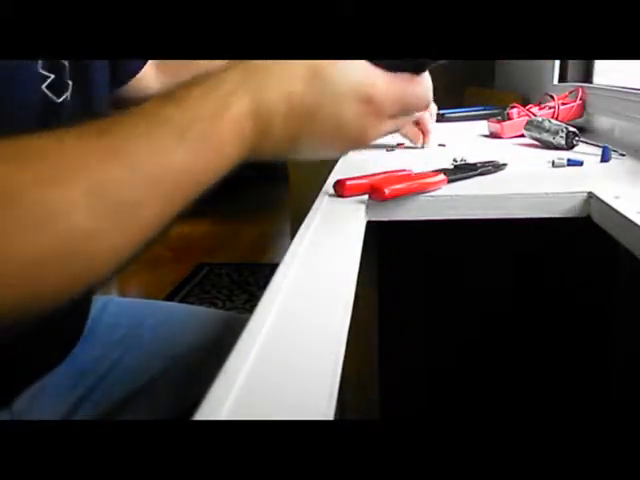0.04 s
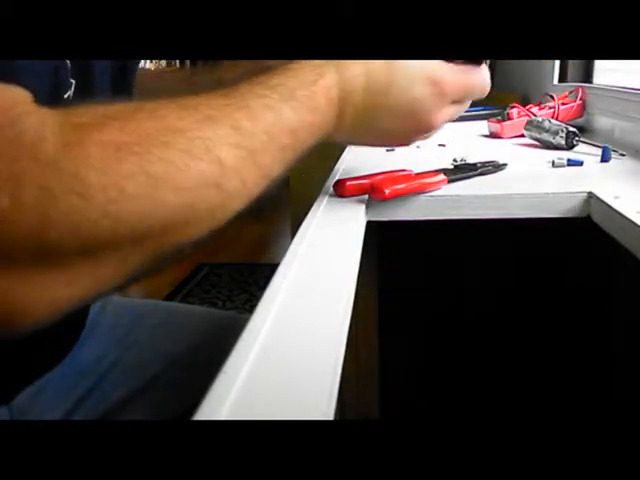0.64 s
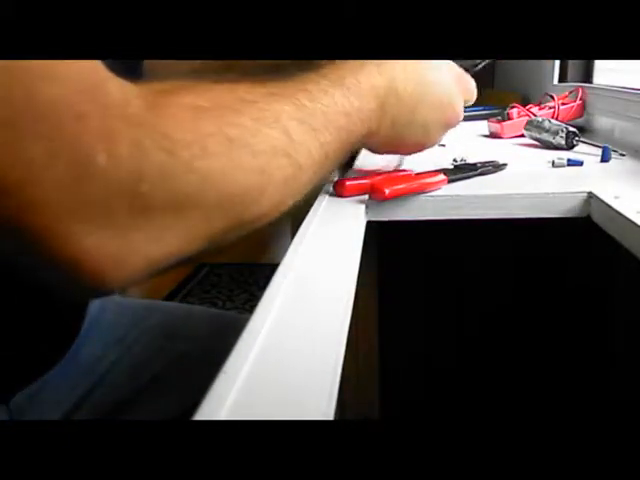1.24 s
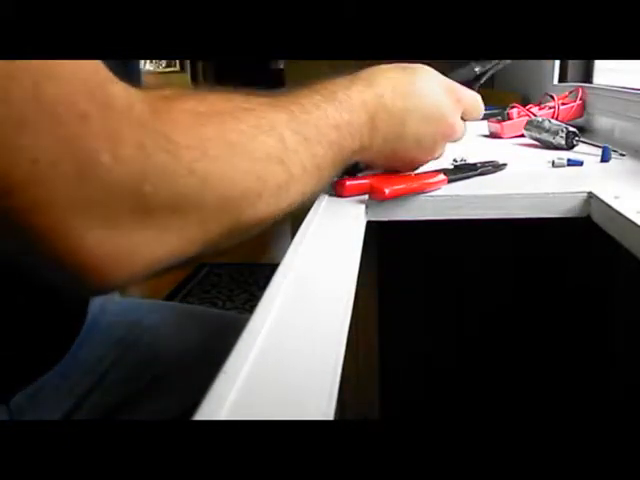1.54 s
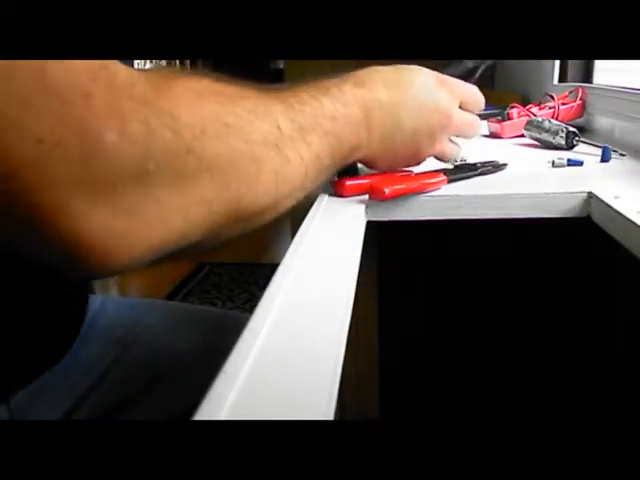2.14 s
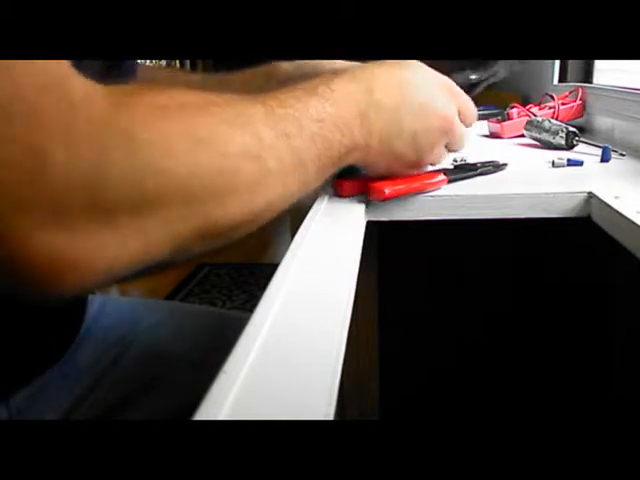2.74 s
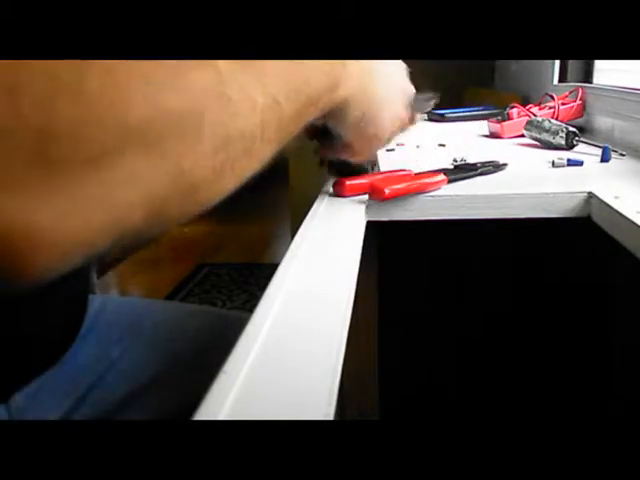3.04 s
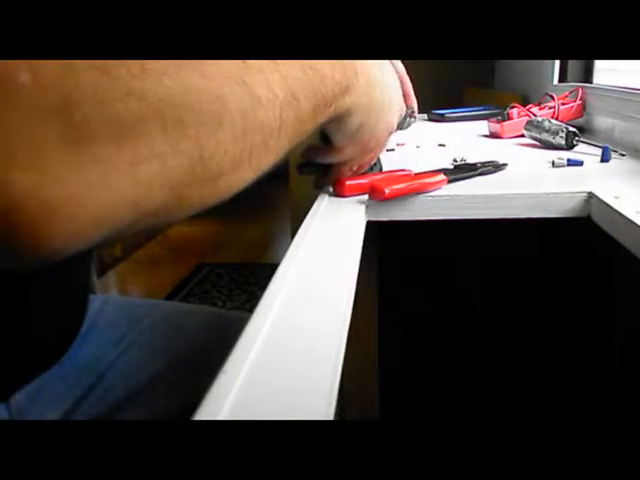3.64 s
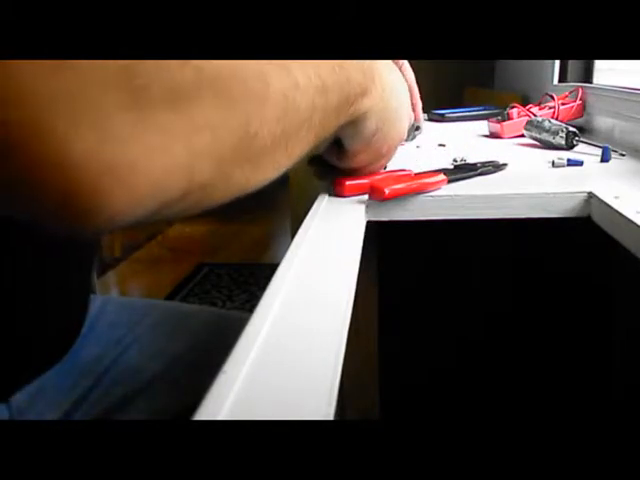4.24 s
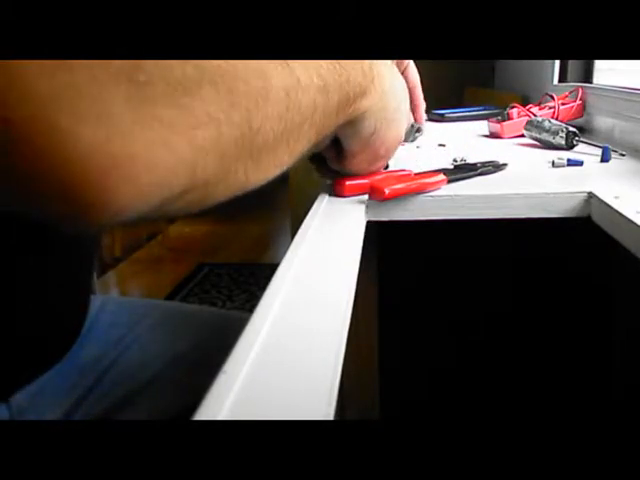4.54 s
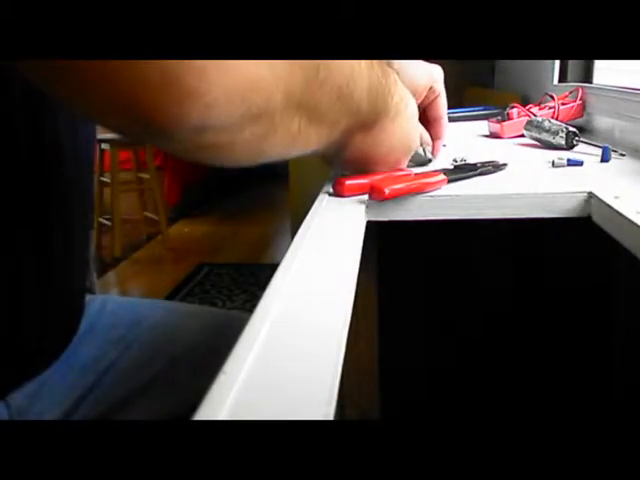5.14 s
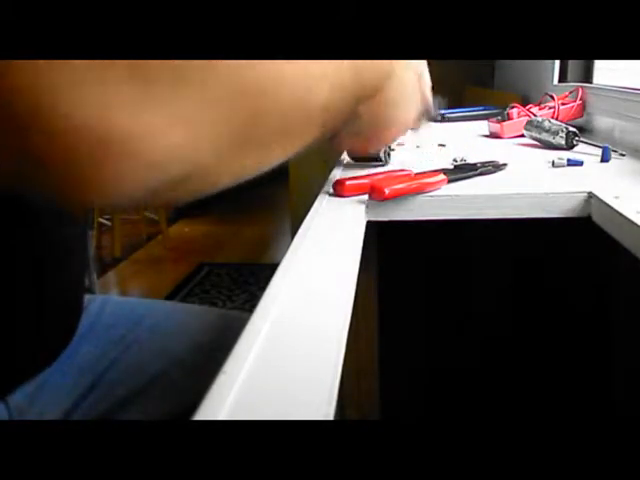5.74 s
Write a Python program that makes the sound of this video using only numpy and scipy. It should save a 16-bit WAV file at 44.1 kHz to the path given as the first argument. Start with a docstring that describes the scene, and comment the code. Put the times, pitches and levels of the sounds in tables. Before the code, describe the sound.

A steel wire stripper clicks and bites, with a faint hiss of insulation sliding through its jaws. Tools then knock and drag on a wooden bench, building to a loud clatter with hollow thumps. Stiff wire rubs softly and rasps along the bench edge, followed by sharp snaps and the grating of a tool tip. The sounds are close, in a small, quiet room, with slightly muted treble.

```python
"""A steel wire stripper clicks in the hand; its jaws bite twice and insulation hisses through them.
From about one second, tools knock and drag on a wooden bench, whose boards boom in their normal modes.
Stiff wire then rubs lightly on the bench and rasps along its edge by stick-slip friction. Last come
more snaps, a slide and the grating of the tool's tip. Throughout, a small room reverberates, and
a narrow-band recorder cuts the treble above 7 kHz and clips any snap that overloads it."""
import sys
import numpy as np
from scipy import signal
from scipy.fft import rfft, irfft, next_fast_len
from scipy.io import wavfile
from scipy.ndimage import map_coordinates

SR = 44100
rng = np.random.default_rng(int(sys.argv[2]) if len(sys.argv) > 2 else 0)


def file_out(sig):
    """Save sig as 16-bit WAV at sys.argv[1]."""
    # one column per channel
    cols = np.atleast_2d(sig).T
    # limit, then scale
    lim = np.clip(cols, -1, 1)
    pcm = np.round(lim * 32767).astype(np.int16)
    wavfile.write(sys.argv[1], SR, pcm)


N = 259749
CONTACT_S = np.arange(SR // 3) / SR  # time within one contact

# low and high normal modes of the bench boards: frequency_hz, level_db, t60_s
BOOM_MODES = [(175.7, -16.5, 0.18), (236.1, -13, 0.014), (289.1, 2.5, 0.13), (315.6, 11, 0.062),
              (430, -11.5, 0.01)]
KNOCK_MODES = [(477, -9, 0.0083), (536.3, 2.5, 0.072), (602, 6, 0.056), (652, -1.5, 0.054),
               (855, -11.5, 0.078), (1109, -15.5, 0.034), (1231, -14.5, 0.092)]
# spectra of an impact's midrange body and bright edge: frequency_hz, level_db
BODY_SPECTRUM = [(60, -33), (400, -13.5), (900, -0.5), (1250, 2.5), (1550, -3.5), (2100, 1.5), (2900, 0),
                 (3800, -3.5), (7000, -20.5)]
EDGE_SPECTRUM = [(300, -16), (2000, -13), (3400, -1), (4500, 1.5), (5500, 1.5), (6800, -1.5), (10000, 0.5)]


def bench_blows():
    """Impact excitation: the tool cracks, brighter the harder the contact; the heavy boards follow."""
    # snips and blows that reach the bench: start_s, level_db, hardness_db, boom_db
    blows = [(1.099, -10, 3.5, -9.5), (1.156, -20, -0.5, -20), (1.169, -9, 0.5, 1),
             (1.263, -8.5, -10, -4.5), (1.279, -12.5, -8, -2.5), (1.364, -29, 3, -3),
             (1.965, -33.5, -0.5, 7.5), (2.218, -7.5, -16, -2.5), (2.241, -18, -19, 8),
             (2.581, -25, -16.5, 2), (2.624, -17.5, -13, -7), (2.658, -2.5, -19.5, -17),
             (2.673, -18, -8, -11), (2.749, -9, -18, -13), (2.77, -3.5, -18, -12), (2.819, -22, -10, -9),
             (3.073, -31.5, -15.5, 7), (3.091, -26, -10, -4), (4.86, -6.5, -4, -1), (5.167, -27, -9, 1),
             (5.236, -18, 9, 1.5), (5.405, -22.5, -1.5, -5.5), (5.823, -6.5, -16, -18),
             (5.835, -12, -31, -12.5)]
    crack_t60_s = 0.049
    out = np.zeros(N)
    for start_s, level_db, hardness_db, boom_db in blows:
        body = crack(BODY_SPECTRUM, crack_t60_s)
        edge = amp(0.95 * hardness_db - 2) * crack(EDGE_SPECTRUM, 0.74 * crack_t60_s)
        boom = amp(boom_db) * ring(BOOM_MODES, attack_s=0.011)
        knock = ring(KNOCK_MODES, attack_s=0.0041)
        add(out, start_s - 0.0005, amp(level_db + hardness_db - 4) * (body + edge))
        add(out, start_s + 0.0015, amp(level_db - 5) * (boom + knock))
    return out


def stripper_clicks():
    """Steel-on-steel impact: a tick, a ping set by the contact point, and the handles' free vibration."""
    # clicks of the jaws and spring: start_s, level_db, ping_hz
    clicks = [(0.0186, -22, 5500), (0.0504, -29, 5070), (0.6235, -30, 5500), (0.6663, -41, 3030),
              (0.71, -44.5, 1870), (0.817, -43.5, 2470), (1.004, -26.5, 1780), (1.0287, -19.5, 1910),
              (1.2304, -35.5, 2840), (1.839, -47, 3740), (2.193, -27, 5010), (2.3494, -48, 6120),
              (2.4527, -37, 3570), (2.749, -23, 4300), (4.331, -48.5, 4360), (4.4987, -49.5, 3020),
              (5.3103, -25, 6400), (5.3428, -34, 6370), (5.8508, -31.5, 3230), (5.8747, -36.5, 3400)]
    # normal modes of the steel: frequency_hz, level_db, t60_s
    steel_modes = [(1240, -16.5, 0.09), (1797, -11, 0.085), (2555, -3, 0.055), (3030, -10, 0.078),
                   (3650, -14.5, 0.11)]
    neutral_ping_hz, sharpen_db_per_octave = 2940, 6.5  # a higher ping has more edge and less body
    out = np.zeros(N)
    for start_s, level_db, ping_hz in clicks:
        sharp_db = sharpen_db_per_octave * np.log2(ping_hz / neutral_ping_hz)
        body = amp(-14 - sharp_db) * crack(BODY_SPECTRUM, t60_s=0.085)
        edge = amp(sharp_db - 2.5) * crack(EDGE_SPECTRUM, t60_s=0.045)
        ping_spectrum = [(0.6 * ping_hz, -30), (0.94 * ping_hz, -14), (ping_hz, 0),
                         (1.06 * ping_hz, -14), (1.5 * ping_hz, -30)]
        ping = amp(-5.5) * crack(ping_spectrum, t60_s=0.06)
        handles = amp(-11 - sharp_db) * ring(steel_modes, attack_s=0.00044)
        add(out, start_s - 0.0005, amp(level_db) * (body + edge + ping + handles))
    return out


def tool_drags():
    """Forced vibration: dragged tools make the boards rumble."""
    # drags: start_s, length_s, pressure_db, grit_db
    strokes = [(1.285, 0.018, -17, -5), (1.33, 0.11, -42, 3.5), (1.45, 0.021, -35.5, 8.5),
               (1.48, 0.033, -32, -15.5), (1.595, 0.043, -47, 5.5), (1.957, 0.029, -26.5, -6.5),
               (2.11, 0.037, -37, -20), (2.19, 0.055, -25, 3), (2.27, 0.02, -40, -20),
               (2.37, 0.059, -39, -7), (2.463, 0.084, -36.5, -22), (2.58, 0.066, -28.5, -3),
               (2.635, 0.12, -13, -5), (2.79, 0.14, -24, -14), (2.95, 0.058, -35.5, -24),
               (3.05, 0.08, -31.5, -18), (3.19, 0.15, -44.5, -30), (4.9, 0.056, -34, -26)]
    # bench resonances: centre_hz, width_hz, level_db
    peaks = [(126, 110, -12), (177, 26, -26.5), (292, 11, 7.5), (313.6, 12.2, 19.5), (540, 37, 12),
             (627.4, 17, 2.5), (651, 10, -15.5), (836, 10, -10), (1082, 72, -4), (1130, 77, 7.5),
             (1390, 27, -6.5)]
    # spectrum of the grit: frequency_hz, level_db
    grit = [(300, -6.5), (900, 7.5), (1300, 13.5), (1600, 9.5), (2300, 11), (3500, 1.5), (5000, -1.5),
            (7000, -11.5), (10000, -7)]
    return scrape(strokes, peaks, grit, boards_db=-2, grating_db=-5.5,
                  catches_per_s=2300, rise_s=0.0053, release_db_per_s=546)


def wire_pulls():
    """Stick-slip friction: stiff wire rasps hollowly along the bench edge."""
    # pulls: start_s, length_s, pressure_db, grit_db
    strokes = [(4.536, 0.071, -20.5, -6.5), (4.625, 0.11, -22, -7), (4.766, 0.075, -25.5, 1.5)]
    # resonances at the edge: centre_hz, width_hz, level_db
    peaks = [(283.6, 23.4, 3.5), (554, 15, 0.5), (665, 49, 10), (780, 33, -13.5), (1140, 45, -7.5),
             (1160, 78, -16)]
    # spectrum of the grit: frequency_hz, level_db
    grit = [(400, -17), (1000, 9), (1400, 10), (2000, 4.5), (2450, 12.5), (3100, 4.5), (4400, -7),
            (5300, -6.5), (7000, -16.5), (10000, -10.5)]
    return scrape(strokes, peaks, grit, boards_db=2.5, grating_db=-1,
                  catches_per_s=2200, rise_s=0.0084, release_db_per_s=528)


def tip_push():
    """Friction at a point contact: the tool's tip grates brightly across the bench top."""
    # pushes: start_s, length_s, pressure_db, grit_db
    strokes = [(5.613, 0.066, -23.5, -10), (5.655, 0.17, -19, -6.5), (5.815, 0.091, -24.5, -7)]
    # resonances under the tip: centre_hz, width_hz, level_db
    peaks = [(167, 45, -31), (318, 13, 4), (542, 10, 6), (607, 24, 6), (673, 23, -24), (880, 38, -28),
             (1140, 82, -12), (1336, 51, -14)]
    # spectrum of the grit: frequency_hz, level_db
    grit = [(300, -26), (900, 9.5), (1400, 7.5), (1900, 4.5), (2600, 2), (3500, 1), (5000, -4),
            (6300, -1.5), (7000, -14.5), (10000, -5)]
    return scrape(strokes, peaks, grit, boards_db=-4, grating_db=-1,
                  catches_per_s=3000, rise_s=0.025, release_db_per_s=534.5)


def bench_bumps():
    """A soft impact excites only the boards, slowly and mostly in their low modes."""
    # bumps of hand and handles: start_s, level_db
    bumps = [(1.409, -32), (1.474, -26.5), (1.496, -31.5), (1.804, -32), (2.589, -17.5), (2.689, -18),
             (2.705, -25), (2.74, -20), (2.849, -22), (3.13, -27.5), (3.276, -36.5), (3.663, -30),
             (3.418, -40), (4.141, -31), (4.458, -19), (4.809, -25), (5.073, -37), (5.453, -33.5)]
    out = np.zeros(N)
    for start_s, level_db in bumps:
        boom = ring(BOOM_MODES, attack_s=0.0062)
        knock = amp(-10) * ring(KNOCK_MODES, attack_s=0.018)
        add(out, start_s, amp(level_db - 4.5) * (boom + knock))
    return out


def insulation_hiss():
    """Friction noise: on smooth insulation, dense catches merge into a hiss."""
    # slides through fingers and jaws: start_s, length_s, level_db, swell_db_per_s
    slides = [(0.001, 0.062, -30.5, -30), (0.133, 0.39, -53, 33.5), (0.58, 0.3, -46.5, -17),
              (5.229, 0.16, -27, -46), (5.517, 0.024, -50, 30)]
    # spectrum of the hiss: frequency_hz, level_db
    spectrum = [(100, -10), (600, -4), (1300, -9.5), (2500, -5.5), (5000, -9), (7000, -12), (10000, -4)]
    envelope = sum(amp(db) * stroke(start_s, length_s, 0.015, release_db_per_s=403, swell_db_per_s=swell)
                   for start_s, length_s, db, swell in slides)
    return amp(3) * envelope * coloured(catches(16000, spread_db=3, clump_db=0.5), spectrum)


def jaw_rasp():
    """Resonance: friction drives the biting jaws at their natural frequencies."""
    # bites: start_s, length_s, level_db, swell_db_per_s
    bites = [(0.527, 0.016, -24, 2), (0.565, 0.03, -36.5, -67)]
    # jaw resonances: centre_hz, width_hz, level_db
    peaks = [(1864, 90, 14), (2130, 200, 4.5), (2530, 60, 9.5), (2940, 130, 2.5), (3270, 57, 5)]
    envelope = sum(amp(db) * stroke(start_s, length_s, 0.015, release_db_per_s=715, swell_db_per_s=swell)
                   for start_s, length_s, db, swell in bites)
    return amp(-0.5) * envelope * resonate(catches(980, spread_db=-2.5, clump_db=2.5), peaks)


def wire_rubbing():
    """Light, unbroken friction drives damped boards: a soft rumble with a little grit."""
    # the hand's pressure on the wire: time_s, pressure_db
    pressure_curve = [(3.47, -76), (3.512, -46), (3.588, -52), (3.686, -36), (3.744, -51), (3.81, -34.5),
                      (3.942, -49), (3.98, -37), (4.064, -50.5), (4.142, -38.5), (4.264, -57), (4.44, -47)]
    # resonances damped by the resting hand: centre_hz, width_hz, level_db
    peaks = [(304.4, 24, 16.5), (526, 13.5, 10.5), (610, 40, 10), (684, 32, -24)]
    # spectrum of the grit: frequency_hz, level_db
    grit = [(300, -12.5), (1100, -4), (1800, 7.5), (2400, 10), (3200, -4), (7000, -32)]
    time_s, pressure_db = np.transpose(pressure_curve)
    pressure = amp(np.interp(np.arange(N) / SR, time_s, pressure_db, left=-200, right=-200))
    boards = boards_shaken(catches(1800, spread_db=4, clump_db=2.5), peaks)
    grating = coloured(slips(3000, spread_db=2, clump_db=2), grit)
    return pressure * (amp(3) * boards + amp(-16.5) * grating)


def reverberation(x):
    """A diffuse field decays exponentially; its tail changes as the hands move."""
    # the room's reverberation time: frequency_hz, t60_s
    decay_times = [(150, 0.51), (600, 0.28), (2500, 0.28), (7000, 0.24)]
    hop, delay_s = SR // 2, 0.0071
    out = np.zeros(N)
    for centre in range(0, N + hop, hop):
        hz, t, noise = signal.stft(rng.standard_normal(SR // 2), SR, nperseg=256)
        decay = np.exp(-np.log(1000) * t / along(decay_times, hz)[:, None])
        tail = signal.istft(noise * decay, SR, nperseg=256)[1]
        start = max(centre - hop, 0)
        part = x[start:centre + hop]
        crossfade = 1 - abs(start + np.arange(len(part)) - centre) / hop
        add(out, start / SR + delay_s, signal.fftconvolve(part * crossfade, tail / np.linalg.norm(tail)))
    return out


def room_air():
    """Stationary noise: the room's air, strongest in the bass."""
    # spectrum of the air: frequency_hz, level_db
    spectrum = [(20, -21.5), (50, -9), (110, 4.5), (250, -3), (600, -3.5), (1000, -10), (2000, -14.5),
                (4000, -19), (7000, -23), (10000, -24.5)]
    return amp(-51) * coloured(rng.standard_normal(N), spectrum)


def ring(modes, attack_s):
    """Modal synthesis: a sum of damped sinusoids, a little different at every blow."""
    scatter = rng.standard_normal((len(modes), 2))
    partials = 0
    for (hz, db, t60_s), (level_scatter, detune_percent) in zip(modes, scatter):
        tone = np.sin(2 * np.pi * hz * (1 + detune_percent / 100) * CONTACT_S)
        partials += amp(db + 2 * level_scatter) * fade(t60_s) * tone
    return onset_unit(partials * (1 - np.exp(-CONTACT_S / attack_s)))


def crack(spectrum, t60_s):
    """Modal overlap: dense, short-lived modes merge into a burst of noise."""
    noise = coloured(rng.standard_normal(len(CONTACT_S)), spectrum)
    attack = 1 - np.exp(-CONTACT_S / 0.00057)
    return onset_unit(noise * fade(t60_s) * attack)


def scrape(strokes, peaks, grit, boards_db, grating_db, catches_per_s, rise_s, release_db_per_s):
    """Sliding friction shakes the boards and grates at the point of contact."""
    grit_exponent = 1.2  # grit comes and goes faster than the pressure
    pressure, roughness = np.zeros(N), np.zeros(N)
    for start_s, length_s, pressure_db, grit_db in strokes:
        envelope = stroke(start_s, length_s, rise_s, release_db_per_s)
        pressure += amp(pressure_db) * envelope
        roughness += amp(pressure_db + grit_db) * envelope ** grit_exponent
    boards = boards_shaken(catches(catches_per_s, spread_db=3, clump_db=4), peaks)
    grating = coloured(slips(catches_per_s, spread_db=-0.5, clump_db=1.5), grit)
    return amp(boards_db) * pressure * boards + amp(grating_db) * roughness * grating


def stroke(start_s, length_s, rise_s, release_db_per_s, swell_db_per_s=0):
    """Envelope of a stroke: it rises, then holds, swells or fades, and decays as the hand lets go."""
    t = np.arange(N) / SR - start_s
    db = swell_db_per_s * np.clip(t, 0, length_s) - release_db_per_s * np.maximum(t - length_s, 0)
    return np.clip(t / rise_s, 0, 1) * amp(db)


def catches(per_s, spread_db, clump_db):
    """Stick-slip as a Poisson process: tiny impulses of uneven size, louder in clumps."""
    ticks = (rng.random(N) < per_s / SR) * rng.standard_normal(N)
    return ticks * amp(spread_db * rng.standard_normal(N) + clump_db * wobble(knots_per_s=90))


def slips(per_s, spread_db, clump_db):
    """Convolution: each catch rings briefly in the rubbed object's dense modes."""
    dense_modes = rng.standard_normal(len(CONTACT_S)) * fade(t60_s=0.04)
    return unit(signal.fftconvolve(catches(per_s, spread_db, clump_db), dense_modes)[:N])


def boards_shaken(friction, peaks):
    """Heavy boards resonate and act as a low-pass filter; the result has rms 1."""
    cutoff_hz = 1004
    return unit(filtered(resonate(friction, peaks), lambda hz: 1 / (1 + (hz / cutoff_hz) ** 4)))


def resonate(x, peaks):
    """Parallel second-order resonators that radiate little bass; the result has rms 1."""
    def response(hz):
        total = 0
        for centre_hz, width_hz, db in peaks:
            resonance = 1j * hz * width_hz / (centre_hz ** 2 - hz ** 2 + 1j * hz * width_hz)
            radiation = 1j * hz / (1j * hz + 0.72 * centre_hz)
            total += amp(db) * resonance * radiation
        return total
    return unit(filtered(x, response))


def coloured(x, spectrum):
    """Spectral shaping of x, at rms 1."""
    return unit(filtered(x, lambda hz: amp(along(spectrum, hz))))


def filtered(x, response):
    """Linear filtering: the spectrum of x times a frequency response."""
    size = next_fast_len(len(x) + 8192)
    return irfft(rfft(x, size) * response(np.fft.rfftfreq(size, 1 / SR)), size)[:len(x)]


def fade(t60_s):
    """Free decay, by 60 dB in t60_s."""
    return np.exp(-np.log(1000) * CONTACT_S / t60_s)


def wobble(knots_per_s):
    """A smooth random curve."""
    return map_coordinates(rng.standard_normal(2000), [np.arange(N) * knots_per_s / SR], mode="wrap")


def along(points, hz):
    """Interpolation on a logarithmic frequency axis."""
    knot_hz, values = np.transpose(points)
    return np.interp(np.log(hz + 1), np.log(knot_hz + 1), values)


def add(track, start_s, sound):
    """Superpose a sound on the track."""
    start = max(round(start_s * SR), 0)
    track[start:start + len(sound)] += sound[:N - start]


def amp(db):
    """Decibels to gain."""
    return 10 ** (np.asarray(db) / 20)


def unit(x):
    """Scale to rms 1."""
    return x / np.sqrt(np.mean(x ** 2) + 1e-20)


def onset_unit(x):
    """Scale to rms 1 over the first 20 ms."""
    return x / np.sqrt(np.mean(x[:SR // 50] ** 2) + 1e-20)


def scene():
    """Superposition of the direct sound, its reverberation and the room's air."""
    steel = stripper_clicks() + insulation_hiss() + jaw_rasp()
    wood = bench_blows() + bench_bumps() + tool_drags() + wire_pulls() + tip_push() + wire_rubbing()
    air = room_air()
    echo = reverberation(amp(-10) * steel + amp(-13.5) * wood)
    return (steel + wood + echo + air)[None]


def record(dry):
    """Band limiting and overload: the recorder cuts treble above 7 kHz and clips at full scale."""
    # the recorder's narrow band, with a faint bump near 9 kHz for its sampling image: frequency_hz, gain_db
    recorder_band = [(6700, -2), (7400, -11), (7800, -32), (8050, -44.5), (8400, -31), (8900, -18.5),
                     (9600, -31.5), (10300, -47.5), (11000, -60.5)]
    top_hz = 16300
    heard = filtered(dry[0], lambda hz: amp(along(recorder_band, hz)))
    clipped = np.clip(heard, -1, 1)
    return filtered(clipped, lambda hz: 1 / (1 + (hz / top_hz) ** 60))[None]


dry = scene()
out = record(dry)
file_out(out)
```